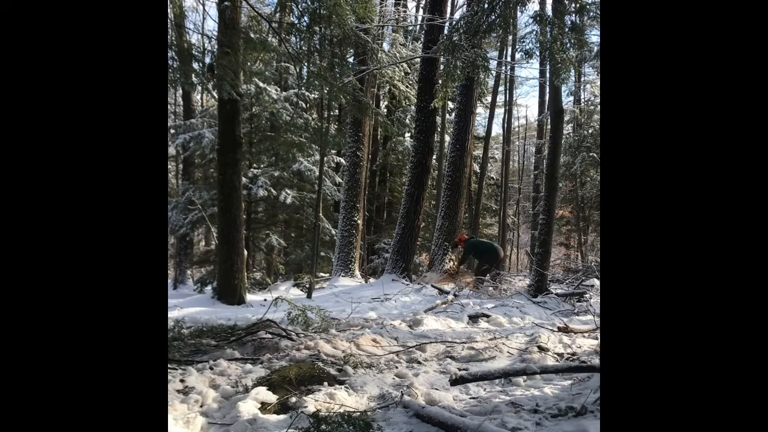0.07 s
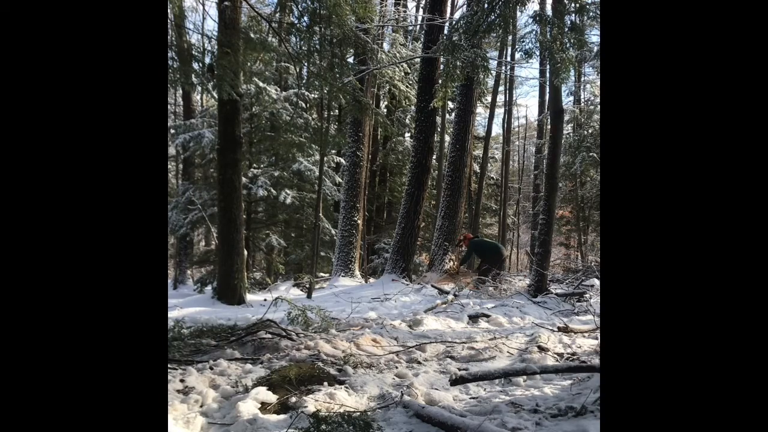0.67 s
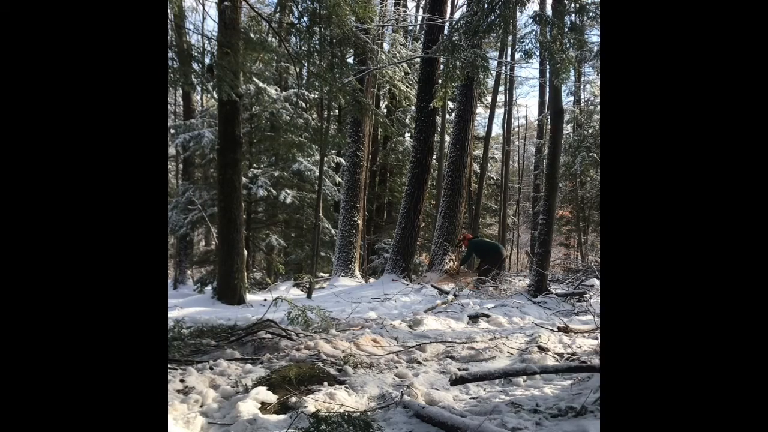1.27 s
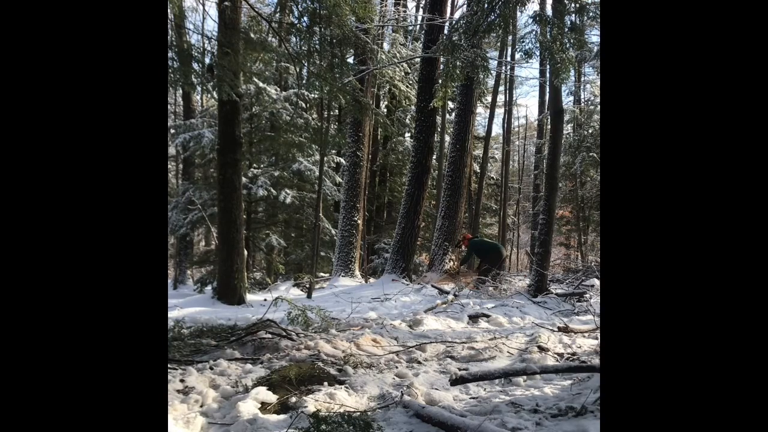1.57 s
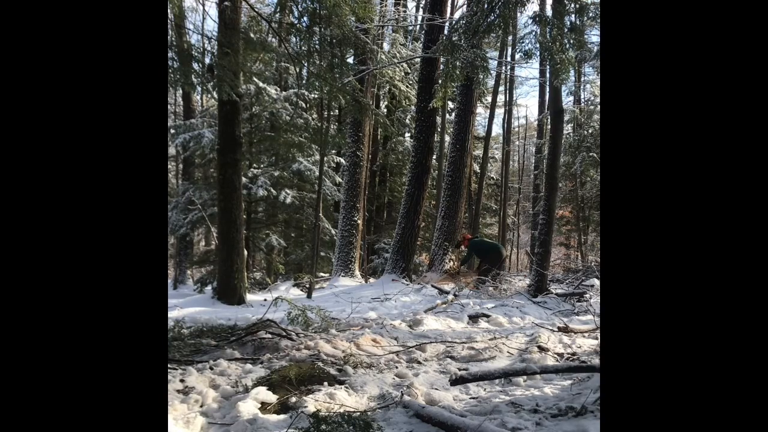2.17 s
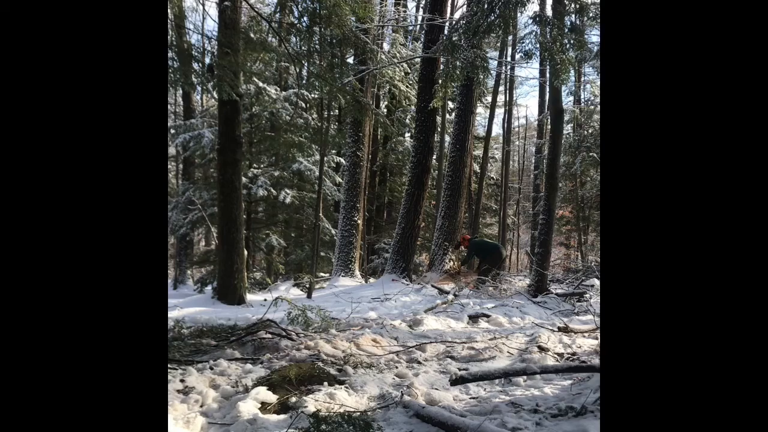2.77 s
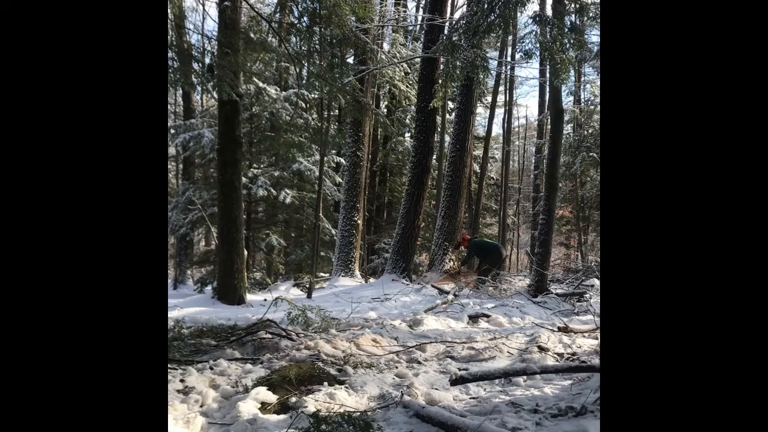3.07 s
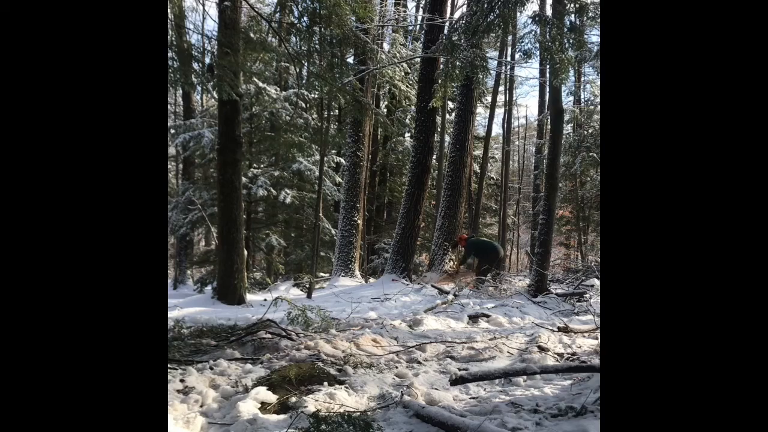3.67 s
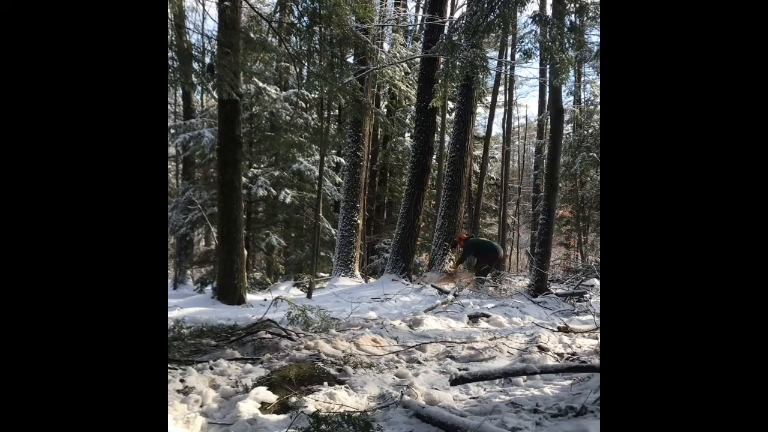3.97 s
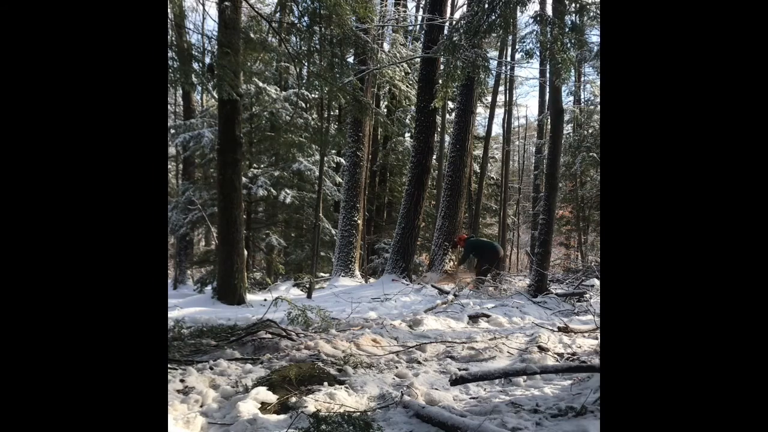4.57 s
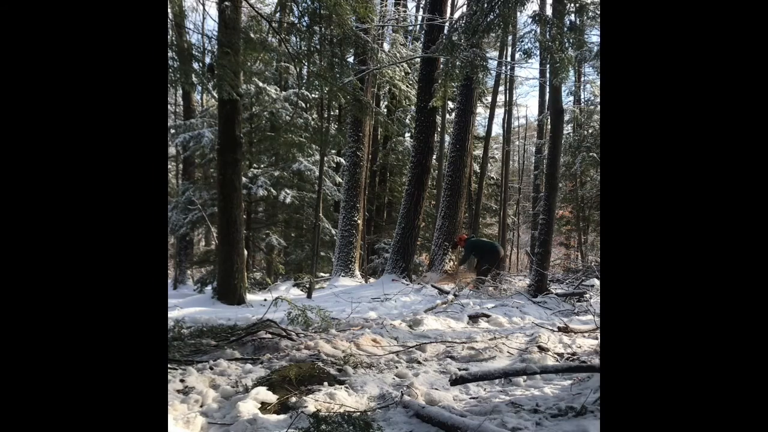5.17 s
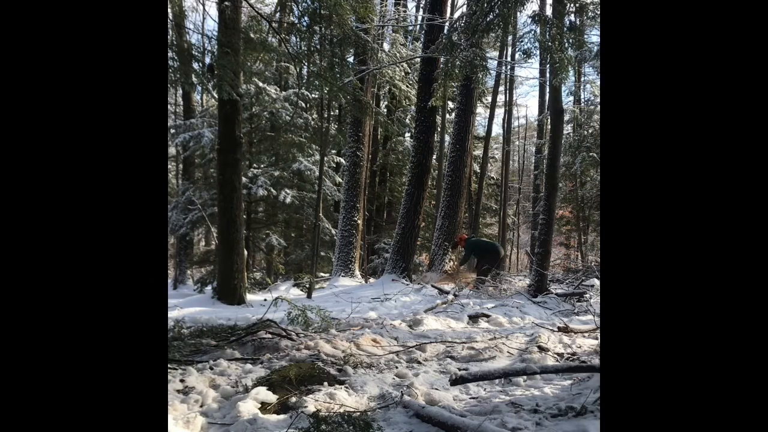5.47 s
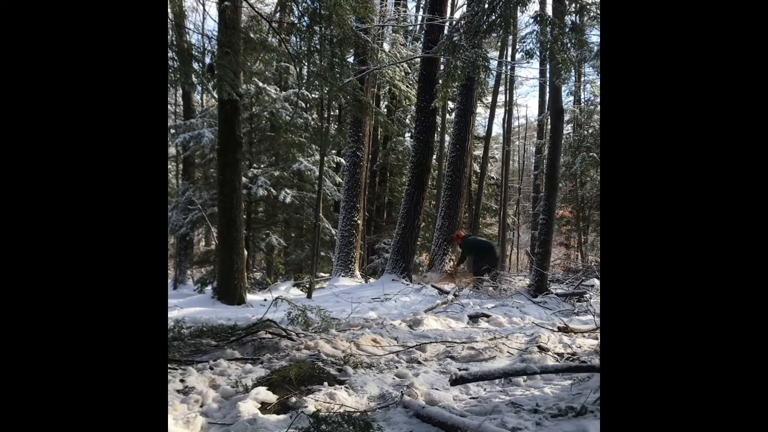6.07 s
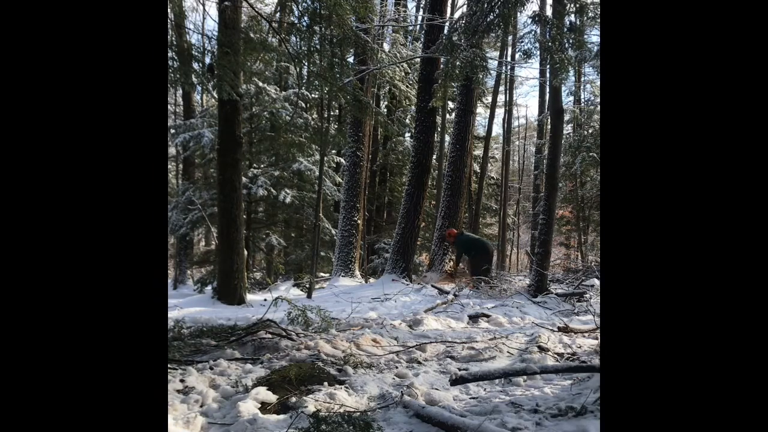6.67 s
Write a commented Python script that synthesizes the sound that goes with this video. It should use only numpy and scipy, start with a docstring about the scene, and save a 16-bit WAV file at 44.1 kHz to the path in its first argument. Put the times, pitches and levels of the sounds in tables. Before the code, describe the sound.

Somewhat distant chainsaw buzzing under load among trees, its pitch sagging and climbing, until a quick rev gives way to an uneven idle.

```python
"""A two-stroke chainsaw bucks a log some way off in snowy woods: it bogs, is blipped, and falls to idle.
Each crank turn gives a round exhaust wave, a sharp crack that rings the muffler, and a jet of gas.
At idle a charge catches hard only now and then. The chain rattles and tears chips.
Trunks scatter the sound over a faint hush of air; both channels are the same."""
import sys
import numpy as np
from scipy import signal
from scipy.fft import rfft, irfft, next_fast_len
from scipy.io import wavfile
from scipy.ndimage import uniform_filter1d

SR = 44100
rng = np.random.default_rng(int(sys.argv[2]) if len(sys.argv) > 2 else 0)


def output_pcm(signal):
    """Save a mono or channel-first signal as 16-bit PCM at the path in sys.argv[1].

    Samples are clipped to [-1, 1] before scaling.
    """
    pcm = np.clip(np.atleast_2d(signal).T, -1, 1) * 32767
    wavfile.write(sys.argv[1], SR, np.round(pcm).astype(np.int16))


N = 304290
T = np.arange(N) / SR

# Each row: time in seconds, working crank speed in Hz.
CRANK_SPEED = [(0.0, 270.5), (0.05, 290.4), (0.13, 287.1), (0.24, 320.4), (0.34, 316), (0.47, 297),
               (0.62, 280.3), (0.8, 273.4), (0.96, 274.8), (1.42, 257.7), (1.68, 254.7), (2.02, 237),
               (2.19, 235.4), (2.35, 242.4), (2.5, 255.8), (2.71, 264.4), (3.07, 272.9), (3.13, 280.7),
               (3.21, 305.7), (3.28, 324.8), (3.48, 342), (3.51, 330.4), (3.59, 245.8), (3.61, 239.5),
               (3.74, 288), (3.8, 301), (3.88, 306), (3.95, 302.8), (4.05, 281), (4.11, 275.4),
               (4.31, 298.2), (4.47, 301.5), (4.63, 288.8), (5.27, 259.9), (5.37, 263), (5.53, 320),
               (5.56, 327.0), (5.58, 319.2), (5.73, 231.5), (5.75, 230.3), (5.83, 289), (5.86, 288)]

def crank():
    """Speed in Hz: sags as the teeth bite, races as they come free, runs down to idle; pops kick it."""
    idle_hz, rundown_s, rundown_shape = 70.2, .206, 1.34
    kick_hz, rise_s, fade_s = 11, .015, .11
    release_s = CRANK_SPEED[-1][0]
    spin = np.exp(-(np.maximum(T - release_s, 0) / rundown_s) ** rundown_shape)
    hz = idle_hz + (curve(CRANK_SPEED) - idle_hz) * spin
    for start_s, db in LONE_FIRINGS:
        if start_s > release_s:
            age_s = np.maximum(T - start_s, 0)
            hz += kick_hz * undb(db) * (1 - np.exp(-age_s / rise_s)) * np.exp(-age_s / fade_s)
    return hz

# Each row: opening time in seconds, release time in seconds, closing span in seconds, chain gain in dB.
TRIGGER_PULLS = [(-0.1, 3.47, .12, -.5), (3.592, 5.555, 0.049, 0.1), (5.725, 5.825, 0.043, 1.9)]

def trigger(opening_s=.0143):
    """Throttle (0 shut, 1 open) and the chain gain that each pull holds until the next."""
    throttle, bite_db = np.zeros(N), np.zeros(N)
    for start_s, release_s, closing_s, db in TRIGGER_PULLS:
        opening = np.clip((T - start_s) / opening_s, 0, 1)
        throttle += opening * np.clip(1 - (T - release_s) / closing_s, 0, 1)
        bite_db[T >= start_s] = db
    return np.minimum(throttle, 1), bite_db

# Exhaust drone with ground reflections, throttle open. Each row: frequency in Hz, level in dB.
PATH_RESPONSE = [(235, -23), (257, -22.5), (269, -24.5), (288, -21.5), (305, -24.5), (322, -24),
                 (340, -26.3), (470, -32.5), (488, -36.5), (515, -34), (548, -34), (575, -40.5), (610, -33),
                 (680, -34.5)]
# Throttle shut, fundamental then octave. Each row: level in dB, crank speed in Hz below which it fades.
COASTING_PARTIALS = [(-38.5, 130), (-44, 117)]

def exhaust_wave(turns, hz, throttle):
    """Round drone of fundamental and octave; swells and dips with pitch as ground reflections mix in."""
    path_hz, path_db = np.transpose(PATH_RESPONSE)
    wave = 0
    for harmonic, phase_rad, flutter_db, flutter_hz in [(1, 1.15, .15, 70), (2, 2.5, 1.3, 40)]:
        coast_db, fade_hz = COASTING_PARTIALS[harmonic - 1]
        open_db = np.interp(np.log(harmonic * hz), np.log(path_hz), path_db)
        shut_db = coast_db - 10 * np.log10(1 + (fade_hz / hz) ** 6.3)
        db = throttle * open_db + (1 - throttle) * shut_db + flutter_db * wander(flutter_hz)
        wave += undb(db) * np.cos(2 * np.pi * harmonic * turns + phase_rad)
    return np.sqrt(2) * wave

def port_pulses(turns, hz, jitter_s, scatter_db):
    """One pulse a turn; the slower the flywheel, the more uneven their timing and strength."""
    timing, strength = rng.standard_normal((2400, 2))[:int(turns[-1])].T
    times_s = np.interp(np.arange(len(timing)) + 1, turns, T)
    slowness = np.median(hz) / np.interp(times_s, T, hz)
    sizes = undb(scatter_db * np.sqrt(slowness) * strength)
    return clicks(times_s + jitter_s * slowness ** 3 * timing, sizes)

# Muffler gas, shell and cavity resonances. Each row: frequency in Hz, width in Hz, relative level in dB.
GAS_MODES = [(732, 77, -6), (962, 44, -1), (1158, 76, -4.5), (1350, 68, 1), (1475, 120, 3), (1632, 74, 3),
             (1835.3, 112, 3), (2004, 51, 1.5), (2207, 170, -1), (2402, 84, 4), (2546, 136, 2),
             (2665, 100, -3), (3220, 120, -0.5), (3400, 180, -2.5)]
SHELL_MODES = [(3670, 51, 1), (3770, 42, -2), (3925, 68, 5), (4083, 66, 3.5), (4192, 49, 1),
               (4350, 120, -3.5), (4788, 104, -3), (5010, 110, -8), (5205, 83, -0.5), (5420, 90, -6),
               (5570, 77, -4), (5875, 70, -4), (6030, 70, -2.5), (6390, 90, -5), (6570, 110, -4),
               (6880, 120, -8.5), (7900, 460, -13), (9800, 1240, -13.5)]
CAVITY_MODES = [(308, 87, 6.5), (457, 72, 5), (564, 60, 0.5)]
# Each row: time in seconds, base level in dB.
CRACK_ENVELOPE = [(0.0, -30.5), (0.4, -29.5), (0.55, -32.5), (1.56, -31), (2.17, -32), (2.63, -30),
                  (3.48, -29.5), (3.57, -34), (3.67, -29.5), (3.86, -32.5), (4.42, -29.5), (5.3, -32),
                  (5.53, -29.5), (5.69, -37), (5.82, -28.5), (5.88, -35), (6.38, -48), (6.9, -49.5)]
SHELL_ENVELOPE = [(0.0, -28.5), (0.36, -27), (0.59, -30), (1.11, -27), (2.25, -32.5), (2.38, -29),
                  (3.21, -27), (3.23, -26.5), (3.3, -25), (4.0, -30), (4.5, -26), (4.61, -30), (5.21, -26),
                  (5.75, -30.5), (5.78, -27.5), (6.15, -49), (6.75, -42), (6.9, -41)]
# Each row: frequency in Hz, relative density in dB.
JET_SPECTRUM = [(30, -32), (50, -18), (80, -3), (130, -1), (250, -6.5), (400, -17), (750, -11.5),
                (1100, -1), (1500, -4), (2400, -11), (4000, 1.5), (8000, -2.5)]

def exhaust_crack(turns, hz, throttle):
    """Blow-down rings the muffler and a gas jet follows; throttle shut, the piston pumps air through."""
    shut = 1 - throttle
    crack_db = curve(CRACK_ENVELOPE) - .54 - 3 * shut
    shell_db = curve(SHELL_ENVELOPE) + 1.05 - 5 * shut
    jet_db = crack_db - 6.315 + 12.87 * shut
    pulses = port_pulses(turns, hz, jitter_s=3e-6, scatter_db=.85)
    crack = steady(colour(pulses, mode_spectrum(GAS_MODES), spread_s=.006)) * undb(crack_db)
    shell = steady(colour(pulses, mode_spectrum(SHELL_MODES), spread_s=.005)) * undb(shell_db)
    jet = unit(colour(puffs(turns, decay_turns=.45, floor=.92), JET_SPECTRUM)) * undb(jet_db)
    pumping = unit(ring(pulses, CAVITY_MODES)) * undb(-40)
    breath = unit(ring(puffs(turns, decay_turns=.25, floor=.1), CAVITY_MODES)) * undb(-49.5)
    return crack + shell + jet + shut * (pumping + breath)

# Running chain and flying chips. Each row: frequency in Hz, relative density in dB.
CHAIN_SPECTRUM = [(300, -28), (800, -16), (1300, -7), (2000, -5), (2900, -1), (3700, 2), (4400, -2),
                  (4950, 1), (6400, -1), (7300, -3), (9600, 1), (11000, -6), (14200, -5), (16000, -9)]
CHIP_SPECTRUM = [(1000, -28), (5000, 4), (10000, 9.5), (11800, 3), (14200, 13), (16000, 0)]
# Bar and link resonances. Each row: frequency in Hz, width in Hz, relative level in dB.
BAR_MODES = [(3654, 230, 4.5), (5235, 420, -10), (6301, 203, -4), (8970, 320, -5)]

def chain(turns, hz, throttle, bite_db):
    """Links clatter with each kick of the crank; in the cut, wood damps the bar and chips spurt."""
    cutting_hz, db_per_octave = 280, 10.5
    chain_db = -28.5 + db_per_octave * np.log2(hz / cutting_hz) + bite_db
    loose = puffs(turns, decay_turns=.37, floor=.23)
    cutting = puffs(turns, decay_turns=1, floor=.84)
    clatter = (throttle * cutting + (1 - throttle) * loose) * undb(.5 * wander(45))
    links = unit(colour(clatter, CHAIN_SPECTRUM, spread_s=.0015)) * undb(-.17 + 1.5 * throttle)
    bar = unit(ring(loose, BAR_MODES)) * undb(-3 - 13 * throttle)
    when, size = rng.random((30000, 2)).T
    spray = clicks(when * T[-1], size ** 3) * rng.standard_normal(N) * undb(wander(60))
    chips = unit(colour(spray, CHIP_SPECTRUM, spread_s=.0025)) * undb(-6 + 2 * throttle)
    return (links + bar + chips) * undb(chain_db)

# Each row: start in seconds, relative level in dB.
LONE_FIRINGS = [(3.606, -2), (5.742, -1), (6.437, -8), (6.509, 0), (6.573, -2), (6.637, 0), (6.803, -9),
                (6.845, 0)]
# Each row: frequency in Hz, width in Hz, relative level in dB.
THUMP_MODES = [(95, 41, -2), (188, 35, 0), (235, 37, -0.5), (520, 130, -12)]

def pops(spit_decay_s=.017):
    """A charge catches hard as the throttle snaps open or at idle: a low thump and a spit of gas."""
    starts_s, db = np.transpose(LONE_FIRINGS)
    kicks = clicks(starts_s, undb(db))
    thump = ring(kicks, THUMP_MODES)
    envelope = signal.lfilter([1], [1, -np.exp(-1 / (spit_decay_s * SR))], kicks + 1e-18)
    spit = envelope * unit(colour(rng.standard_normal(N), CHAIN_SPECTRUM))
    return undb(-30) * thump / np.abs(thump).max() + undb(-38) * spit

# Each row: frequency in Hz, echo gain in dB.
TRUNK_RESPONSE = [(300, -14), (600, -8), (1500, 0), (4000, 0), (8000, -3), (15000, -8)]

def woods(x, near_db, near_s, far_db, t60_s):
    """Adds quick echoes from nearby trunks and a diffuse tail from the stand behind them."""
    distance, strength = rng.random((14, 2)).T
    near = clicks(.002 + near_s * distance, (2 * strength - 1) * np.exp(-distance))[:SR]
    far = rng.standard_normal(SR) * undb(-60 * T[:SR] / t60_s) * (1 - np.exp(-T[:SR] / .075))
    echo = undb(near_db) * near / np.linalg.norm(near) + undb(far_db) * far / np.linalg.norm(far)
    return x + signal.fftconvolve(x, colour(echo, TRUNK_RESPONSE))[:N]

# Each row: frequency in Hz, relative density in dB.
AIR_SPECTRUM = [(25, -22), (80, 2.5), (300, 3.5), (800, -9), (4000, -3.5), (15000, -62)]

def still_air(level_db):
    """The even hush of the woods."""
    return undb(level_db) * unit(colour(rng.standard_normal(N), AIR_SPECTRUM))

def undb(db):
    """Decibels to gain."""
    return 10 ** (np.asarray(db) / 20)

def curve(rows):
    """Straight lines through (seconds, value) rows."""
    return np.interp(T, *np.transpose(rows))

def unit(x):
    """Scale to rms 1."""
    return x / np.sqrt(np.mean(x ** 2))

def steady(x):
    """Hold the rms near 1 over a few crank turns."""
    power = uniform_filter1d(uniform_filter1d(x ** 2, size=1800), size=1800)
    return x / np.sqrt(np.abs(power) + 1e-6 * np.mean(x ** 2))

def wander(rate_hz):
    """Random drift with a spread near 1."""
    knots_s = np.arange(0, T[-1] + 1, 1 / rate_hz)
    return np.interp(T, knots_s, rng.standard_normal(4096)[:len(knots_s)]) * np.sqrt(3 / 2)

def puffs(turns, decay_turns, floor):
    """Noise that surges once a turn and decays toward a floor."""
    return unit(rng.standard_normal(N) * (floor + np.exp(-(turns % 1) / decay_turns)))

def clicks(times_s, sizes):
    """Impulses placed between samples by a windowed sinc."""
    position = times_s[:, None] * SR
    index = position.astype(int) + np.arange(-5, 7)
    taps = np.sinc(index - position) * np.sinc((index - position) / 6) * sizes[:, None]
    return np.bincount(np.clip(index, 0, N).ravel(), taps.ravel(), N + 1)[:N]

def colour(x, points, spread_s=0):
    """Filter by (Hz, dB) points; winding paths delay each frequency by up to spread_s."""
    hz, db = np.transpose(points)
    size = next_fast_len(len(x) + 4096)
    bins_hz = np.arange(size // 2 + 1) * SR / size
    lag_s = spread_s * np.interp(bins_hz, np.linspace(0, SR / 2, 80), rng.random(80))
    gain = undb(np.interp(np.log(bins_hz + 1), np.log(hz), db))
    phase_rad = -2 * np.pi * np.cumsum(lag_s) * bins_hz[1]
    return irfft(rfft(x, size) * gain * np.exp(1j * phase_rad), size)[:len(x)]

def mode_spectrum(modes):
    """(Hz, dB) points of narrow resonances; overtones flare as they glide through them."""
    grid_hz = np.arange(20, 16500, 10)
    power = sum(undb(2 * db) / (1 + ((grid_hz - hz) / width_hz) ** 2) ** 2 for hz, width_hz, db in modes)
    return np.column_stack([grid_hz, 10 * np.log10(power)])

def ring(x, modes):
    """Parallel resonators, each applied twice for steep skirts."""
    out = 0
    for hz, width_hz, db in modes:
        b, a = signal.iirpeak(hz, hz / (width_hz * np.sqrt(2)), fs=SR)
        out += undb(db) * signal.lfilter(b, a, signal.lfilter(b, a, x + 1e-18))
    return out

def scene():
    """Crank speed and throttle drive the saw; the woods answer."""
    hz = crank()
    throttle, bite_db = trigger()
    turns = np.cumsum(hz * (1 + .000903 * wander(50))) / SR
    exhaust = exhaust_wave(turns, hz, throttle) + exhaust_crack(turns, hz, throttle)
    saw = exhaust + chain(turns, hz, throttle, bite_db) + pops()
    air = still_air(level_db=-52)
    mono = woods(saw, near_db=-11, near_s=.02, far_db=-11.5, t60_s=.65) + air
    return np.array([mono, mono])

def record(dry):
    """A steep low-pass cuts the top."""
    cutoff_hz = 15800
    return signal.sosfilt(signal.ellip(10, .2, 80, cutoff_hz, fs=SR, output="sos"), dry)

dry = scene()
out = record(dry)
output_pcm(out)
```